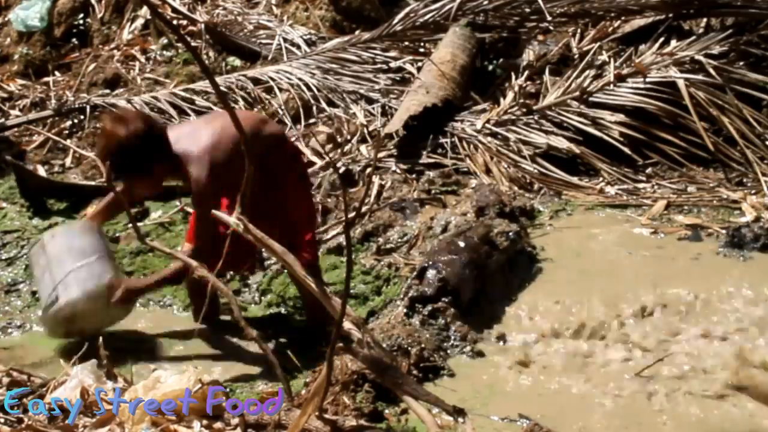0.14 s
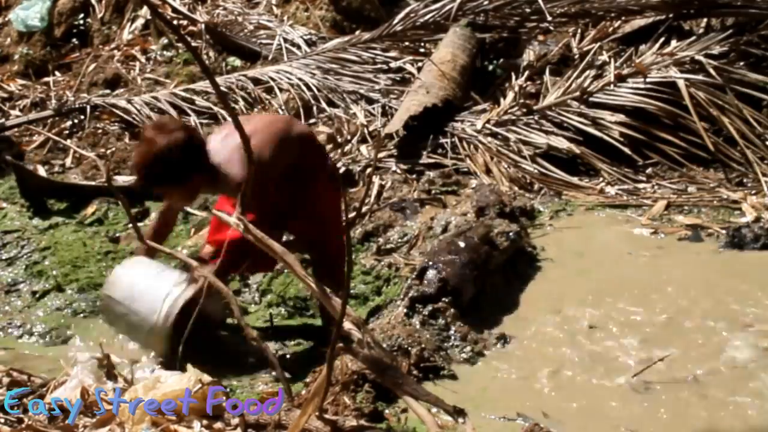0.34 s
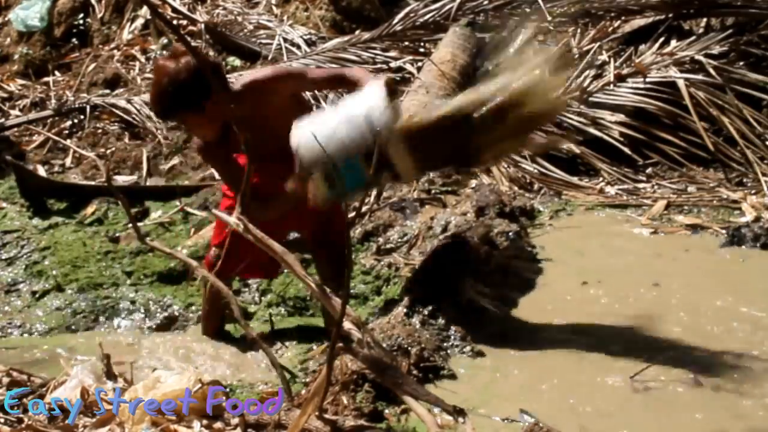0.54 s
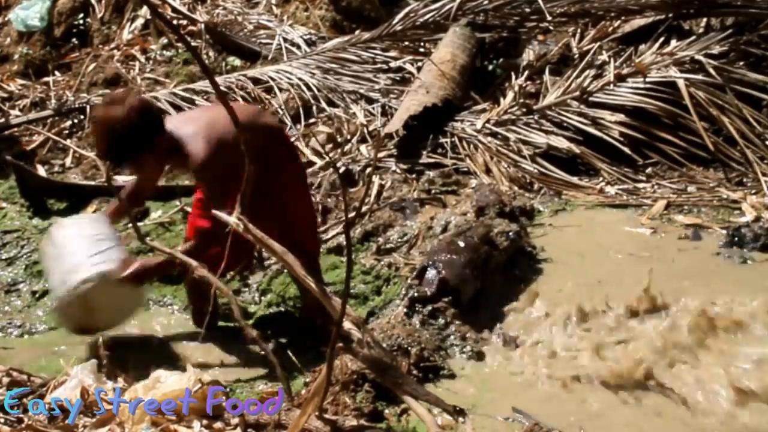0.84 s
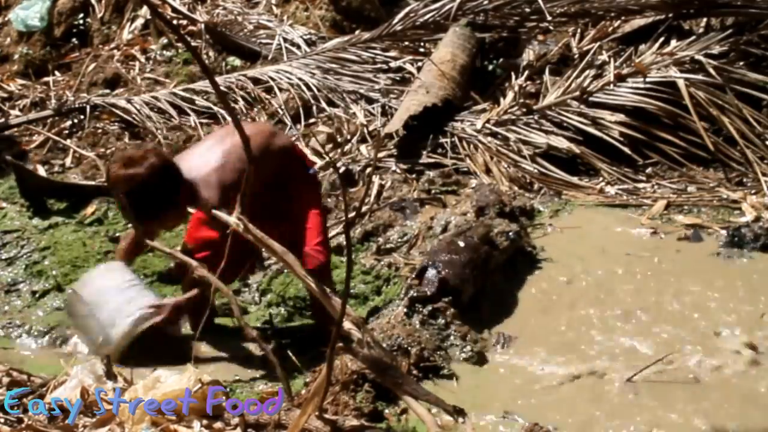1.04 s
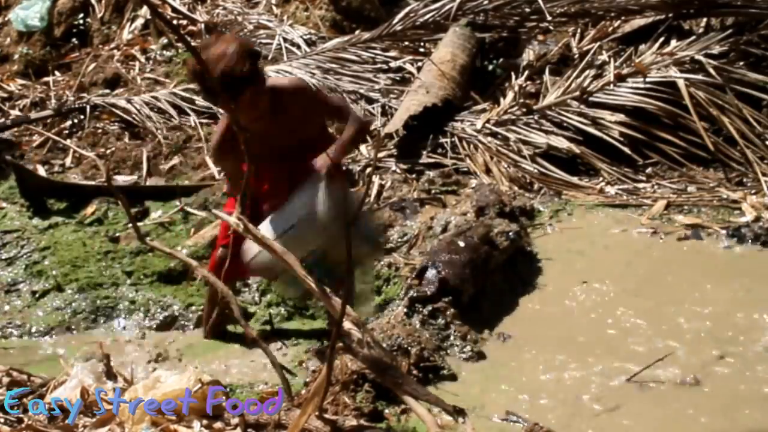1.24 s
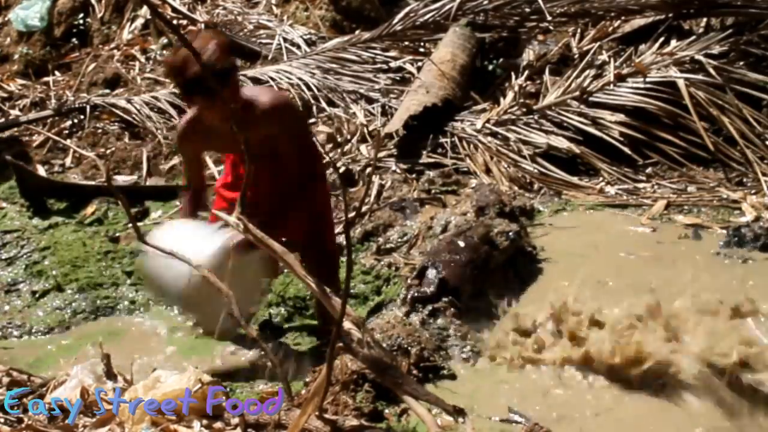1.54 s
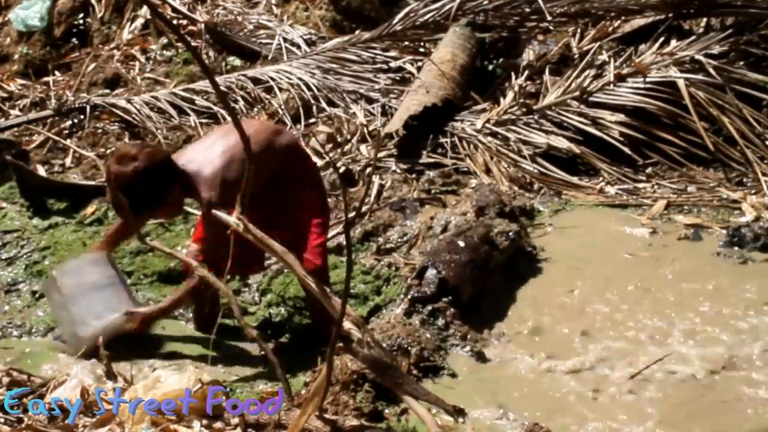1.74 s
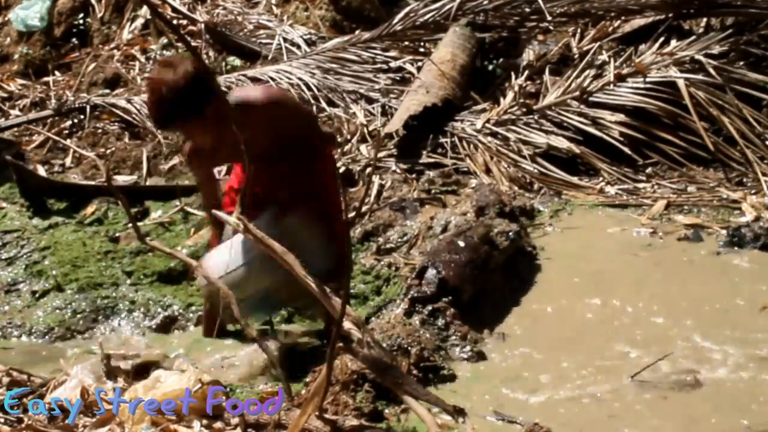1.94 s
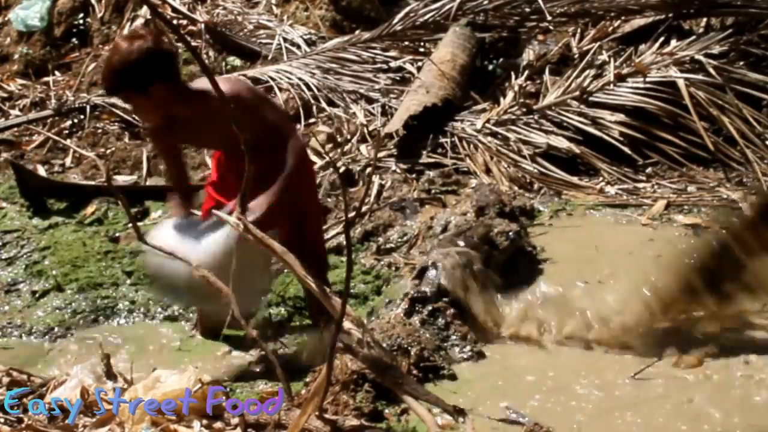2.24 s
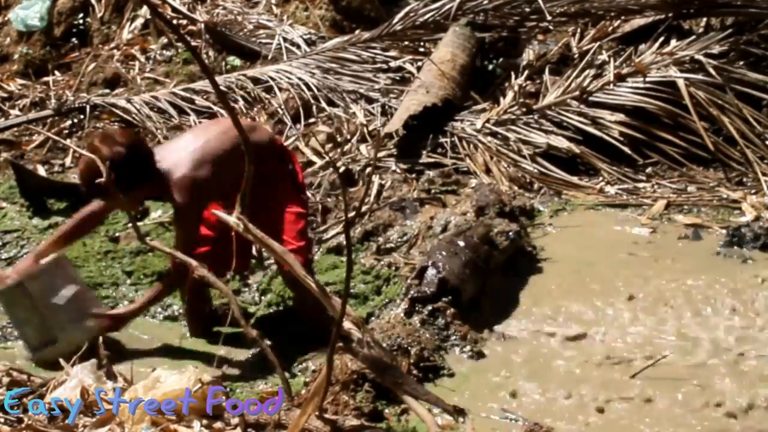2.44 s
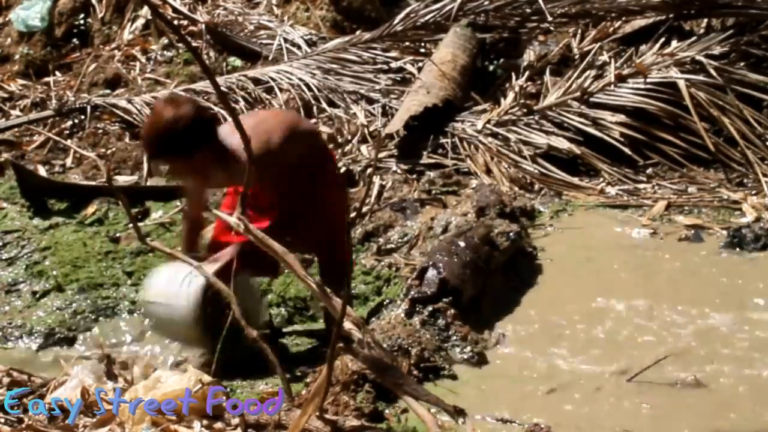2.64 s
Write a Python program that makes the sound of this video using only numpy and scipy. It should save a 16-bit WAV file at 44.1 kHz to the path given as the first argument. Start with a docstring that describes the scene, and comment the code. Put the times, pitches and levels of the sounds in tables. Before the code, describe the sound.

Muddy water flung from a plastic bucket smacks into a shallow pool, again and again

```python
"""A plastic bucket bails a shallow muddy pool in the open air, about one throw every 0.75 s.
Over faint air and a trickle (shaped noise), fine drops spatter (band noise) and a load smacks down
(short resonances), splashes as noise impacts and bubble tones, then patters out. Before the next throw
the bucket dips with a hollow gulp (a rising sine), gurgles as bubbles climb in pitch, and water sloshes
in while air pockets plop (single bubble tones) and water clops on plastic (damped modes)."""
import sys
import numpy as np
from scipy import signal
from scipy.fft import rfft, irfft, next_fast_len
from scipy.io import wavfile

SR = 44100
rng = np.random.default_rng(int(sys.argv[2]) if len(sys.argv) > 2 else 0)


def dump(signal):
    """Clip the signal to [-1, 1] and save it as 16-bit WAV at the path in sys.argv[1]."""
    limited = np.clip(np.atleast_2d(signal).T, -1, 1)
    pcm = np.round(limited * 32767).astype(np.int16)
    wavfile.write(sys.argv[1], SR, pcm)


N = 123479
T = np.arange(N) / SR  # s


def from_db(db):
    """Logarithmic level: decibels become an amplitude gain."""
    return 10 ** (np.asarray(db) / 20)


def rms_one(x):
    """Normalisation: scale to unit root mean square."""
    return x / np.sqrt(np.mean(x ** 2) + 1e-20)


def at_hz(points, hz):
    """Interpolation of a spectrum along a logarithmic frequency axis."""
    f, db = np.transpose(points)
    return np.interp(np.log(np.maximum(hz, 1)), np.log(f), db)


def colour(x, spectrum):
    """Minimum-phase filtering: a causal filter of the given spectrum; white input keeps its level."""
    size = 2 * next_fast_len(N // 2 + 8192)
    hz = np.arange(size // 2 + 1) * SR / size
    gain = rms_one(from_db(at_hz(spectrum, hz)))
    # folding the cepstrum onto positive time makes the filter causal
    cepstrum = irfft(np.log(gain))
    cepstrum[1:size // 2] *= 2
    cepstrum[size // 2 + 1:] = 0
    response = np.exp(rfft(cepstrum))
    return irfft(rfft(x, size) * response)[:N]


def add(out, s, sound):
    """Superposition: mix a sound in at a time in seconds."""
    i = int(np.clip(s * SR, 0, N - 1))
    out[i:i + len(sound)] += sound[:N - i]


def drift(rate):
    """Low-passed noise: a smooth random course with spread 1 and corner rate in Hz."""
    r = np.exp(-2 * np.pi * rate / SR)
    noise = rng.standard_normal(N + SR)
    return rms_one(signal.lfilter([1], [1, -2 * r, r * r], noise)[SR:])  # skip the filter's first second


def swell(s, rise, fall):
    """Exponential growth to 1 at a time, then exponential decay."""
    return np.exp(-np.minimum(np.maximum((s - T) / rise, (T - s) / fall), 50))


def drops(per_s, spread_db, clump_db):
    """Random impulse train: droplet impacts of uneven size that come in clumps; rms 1."""
    sizes = from_db(spread_db * np.minimum(rng.exponential(1, N), 4)) * rng.choice([-1, 1], N)
    impacts = rng.random(N) < per_s / SR
    return rms_one(sizes * impacts * from_db(clump_db * drift(68)))


BUBBLE_RISE = 0.13  # pitch gains twice this share by t60


def bubble(hz, t60, onset_s):
    """Bubble resonance: a sine that swells, decays and rises in pitch as the bubble nears the surface."""
    t = np.arange(int((t60 + onset_s) * SR)) / SR
    onset = np.sin(np.pi / 2 * np.minimum(t / onset_s, 1)) ** 2
    decay = from_db(-60 * np.maximum(t - onset_s, 0) / t60)
    return onset * decay * np.sin(2 * np.pi * hz * t * (1 + BUBBLE_RISE * t / t60))


# relative height of a bubble's tone against its pitch: (f/Hz, level/dB)
BUBBLE_HEIGHTS = [(350, -6), (460, -10), (700, -2.5), (1400, 3.5), (3000, 5.5), (7000, -0.5), (11000, 2)]
BUBBLE_CYCLES = 15.4  # mean cycles to fall 60 dB
BUBBLE_SPREAD_DB = 2.5  # mean of the random extra height, before its cap


def bubbles(level, count, cycles):
    """Superposed resonators: a cloud of mostly small bubbles, each as strong as the flow at its birth."""
    out, energy = np.zeros(N), 0
    low, high = BUBBLE_HEIGHTS[0][0], BUBBLE_HEIGHTS[-1][0]
    for when, pitch, size, life, sign in rng.random((count, 5)):
        hz = low * (high / low) ** (pitch ** .7)
        db = at_hz(BUBBLE_HEIGHTS, hz) + BUBBLE_SPREAD_DB * min(-np.log(1 - size), 3)
        tone = bubble(hz, cycles * (.5 + life) / hz, .5 / hz)
        sound = from_db(db) * np.sign(sign - .5) * tone
        energy += sound @ sound
        add(out, when * N / SR, sound * level[int(when * N)])
    return out / np.sqrt(energy / N)


def slaps(events, modes):
    """Modal synthesis: each slap rings the same damped resonances at a pitch of its own."""
    out = np.zeros(N)
    for s, db, hz, *_ in events:
        for k, (ratio, mode_db, t60) in enumerate(modes):
            level = from_db(db + mode_db + rng.normal(0, 1))
            add(out, s, (-1) ** k * level * bubble(hz * ratio, t60, 1 / hz))
    return out


SPIT_RISE_S = 0.0014  # a spit of spray takes a moment to open
# relative spectral density of a spit of spray: (f/Hz, level/dB per Hz)
SPIT_SPECTRUM = [(60, -48), (250, -16.5), (700, -1.5), (1500, 3.5), (4000, -3.5), (8000, -11.5),
                 (16000, -26)]


def spits(events, t60):
    """Decaying filtered noise: a tiny burst of spray for each event."""
    envelope, t = np.zeros(N), np.arange(SR // 10) / SR
    for s, db, *_ in events:
        add(envelope, s, from_db(db - 60 * t / t60) * np.minimum(t / SPIT_RISE_S, 1))
    return colour(envelope * rng.standard_normal(N), SPIT_SPECTRUM)


AIR_DB = -50.5
# relative spectral density of the outdoor air: (f/Hz, level/dB per Hz)
AIR_SPECTRUM = [(25, 0), (60, -3.5), (200, 7), (600, -1), (1000, 0.5), (1500, 5.5), (3000, -1.5),
                (7000, -10.5), (12000, -16), (16000, -27)]


def outdoor_air():
    """Stationary broadband noise: the faint open air."""
    return from_db(AIR_DB) * colour(rng.standard_normal(N), AIR_SPECTRUM)


BANK_DB, BANK_T60_S, BANK_BAND_HZ = -27, 0.17, [250, 2200]


def banks(x):
    """Diffuse reflection: dull, short scatter from the mud banks and dry fronds."""
    t = np.arange(SR // 2) / SR
    echoes = rng.standard_normal(len(t)) * from_db(-60 * t / BANK_T60_S) * (t > .005)
    echoes = signal.sosfilt(signal.butter(2, BANK_BAND_HZ, "band", fs=SR, output="sos"), echoes)
    return from_db(BANK_DB) * signal.fftconvolve(x, echoes / np.sqrt(echoes @ echoes))[:N]


TRICKLE_DB, SLOSH_SPRAY_DB, SLOSH_BUBBLES_DB = -54.5, -2.5, -2.5
# swells of flow round the bucket: (peak t/s, level/dB, rise t/s, fall t/s)
SLOSH_SWELLS = [(0.495, -35, 0.04, 0.017), (0.553, -37.5, .02, 0.052), (1.161, -35.5, 0.017, 0.0089),
                (1.214, -40.5, 0.011, 0.016), (1.305, -39, 0.046, 0.094), (1.90, -49, 0.3, 0.043),
                (2.03, -40.5, 0.08, 0.058), (2.115, -42.5, 0.04, 0.046), (2.69, -41.5, 0.1, 0.41),
                (2.784, -36, 0.004, 0.015)]
# relative spectral density of slosh spray: (f/Hz, level/dB per Hz)
SLOSH_SPECTRUM = [(40, -24), (200, -6), (420, 2), (700, -1), (1200, 1.5), (3000, 0.5), (8000, -5),
                  (11000, -15), (16000, -20)]


def sloshes():
    """Flow-modulated impacts and bubbles: water runs into and off the bucket, over a steady trickle."""
    flow = from_db(TRICKLE_DB)
    for s, db, rise, fall in SLOSH_SWELLS:
        flow = flow + from_db(db) * swell(s, rise, fall)
    spray = colour(flow * drops(per_s=6000, spread_db=1.5, clump_db=3.0), SLOSH_SPECTRUM)
    cloud = bubbles(flow, count=3000, cycles=BUBBLE_CYCLES)
    return from_db(SLOSH_SPRAY_DB) * spray + from_db(SLOSH_BUBBLES_DB) * cloud


GULP_RISE_PER_S = 0.92  # share of the first pitch gained each second
GULP_WAVER = 0.26  # spread in phase (rad) and as a share of level
# the bucket dips and swallows water: (t/s, length t/s, f/Hz, level/dB)
GULP_NOTES = [(0.279, 0.026, 200, -34), (1.054, 0.027, 195, -43), (1.102, .032, 197, -41.5),
              (1.139, 0.028, 221, -27), (1.853, 0.067, 204, -30.5), (2.533, 0.027, 193, -42),
              (2.605, 0.073, 202.5, -44)]


def gulps():
    """Cavity resonance: air in the dipping bucket gives a low, unsteady note that rises as it fills."""
    out = np.zeros(N)
    for s, length, hz, db in GULP_NOTES:
        t = np.arange(int(length * SR)) / SR
        waver = GULP_WAVER * drift(35)[:len(t)]
        phase = 2 * np.pi * hz * t * (1 + GULP_RISE_PER_S * t / 2) + waver
        add(out, s, from_db(db) * signal.windows.tukey(len(t), .4) * np.sin(phase))
    return out * (1 + GULP_WAVER * drift(57))


GURGLE_T60_S, GURGLE_BUBBLES_PER_S = 0.04, 110
GURGLE_SCATTER = 0.32  # largest deviation of log pitch
DAUGHTER_DB, DAUGHTER_RATIO = -5.5, 2.59  # level against a mean parent; highest multiple of its pitch
# runs of bubbles as a hollow fills: (t/s, length t/s, first f/Hz, last f/Hz, level/dB)
GURGLE_RUNS = [(0.362, 0.091, 206, 280, -47.5), (0.52, 0.093, 415, 473, -48.5),
               (1.155, 0.035, 240, 270, -40.5), (1.195, 0.038, 392, 477, -42), (1.265, 0.03, 360, 390, -45),
               (1.643, 0.095, 384, 554, -38.5), (1.85, 0.061, 393, 438, -41),
               (1.928, 0.045, 292, 418, -40.5), (2.089, 0.11, 394, 488, -46.5),
               (2.335, 0.084, 202, 302, -39.5), (2.391, 0.081, 397, 573, -30.5),
               (2.605, 0.05, 235, 335, -41.5), (2.645, 0.054, 242, 410, -45.5)]


def gurgles():
    """Bubble resonance in a filling hollow: big uneven bubbles climb in pitch and shed smaller ones."""
    out = np.zeros(N)
    for s, length, first_hz, last_hz, db in GURGLE_RUNS:
        run = np.zeros(int((length + 2 * GURGLE_T60_S) * SR))
        count = int(length * GURGLE_BUBBLES_PER_S) + 1
        for k, (when, pitch, size, split, late) in enumerate(rng.random((count, 5))):
            share = (k + when) / count
            birth = share * length
            hz = (first_hz + share * (last_hz - first_hz)) * np.exp(GURGLE_SCATTER * (2 * pitch - 1))
            add(run, birth, (.5 + size) * bubble(hz, GURGLE_T60_S, 1 / hz))
            daughter = bubble(hz * DAUGHTER_RATIO ** (.5 + split / 2), GURGLE_T60_S, 1 / hz)
            add(run, birth + late * GURGLE_T60_S / 2, from_db(DAUGHTER_DB) * daughter)
        add(out, s, from_db(db) * run / np.sqrt(run @ run / (length * SR)))
    return out


# large air pockets: (t/s, f/Hz, level/dB, swell t/s, t60 t/s)
AIR_POCKETS = [(0.111, 510, -10, 0.0034, .04), (0.157, 466, -11, 0.0033, 0.052),
               (0.355, 392, -28, 0.0042, 0.023), (0.485, 429, -12, 0.0055, 0.039),
               (0.499, 445, -32, 0.0053, 0.088), (0.542, 1064, -12.5, 0.0022, 0.032),
               (0.545, 370, -26, 0.0016, 0.055), (0.865, 724, -13.5, 0.0029, 0.055),
               (0.879, 446, -10, 0.005, 0.024), (1.045, 540, -27, .0032, 0.022),
               (1.062, 590, -23.5, 0.0018, 0.011), (1.151, 367, -21.5, 0.0031, 0.017),
               (1.293, 1340, -26, .003, .034), (1.324, 1937, -17.5, 0.00087, 0.025),
               (1.606, 994, -16.5, .003, 0.082), (1.992, 537, -35, 0.011, 0.048),
               (2.069, 920, -17.5, .002, 0.046), (2.345, 430, -17, .004, 0.021),
               (2.432, 488, -19.5, 0.0034, 0.044), (2.622, 752, -29.5, 0.0084, 0.067)]


def plops():
    """Single bubble resonance: large pockets of trapped air ring briefly."""
    out = np.zeros(N)
    for s, hz, db, onset_s, t60 in AIR_POCKETS:
        add(out, s, from_db(db) * bubble(hz, t60, onset_s))
    return out


HOLLOW_HZ, HOLLOW_DB, HOLLOW_T60_S = 222, -26.5, 0.05  # the air in the bucket answers each clop
CLOP_SPRAY_DB, CLOP_SPRAY_T60_S = -7.5, 0.023
# water clops against the bucket: (t/s, level/dB, f/Hz)
CLOP_HITS = [(0.447, -20, 1104), (0.540, -19, 1394), (0.746, -28.5, 970), (1.157, -30, 1146),
             (1.163, -21, 1014), (1.3235, -11, 1272), (1.334, -18, 1077), (2.0649, -9.5, 1125),
             (2.074, -17.5, 1120), (2.086, -23.5, 1270), (2.138, -20, 1030), (2.635, -27, 1076),
             (2.678, -24.5, 1255)]
# resonances of a clop: (ratio to its f, level/dB, t60 t/s)
CLOP_RESONANCES = [(.35, -19, 0.047), (.82, -10.5, 0.062), (1.0, -2, 0.011), (1.2, -11.5, 0.012),
                   (1.55, -15.5, 0.022), (2.0, -9, 0.025), (2.5, -14.5, 0.019), (3.7, -13.5, 0.019)]


def clops():
    """Impact excitation of modes: water slaps shut against the plastic and spits a little spray."""
    hollow_hits = [(s, db, HOLLOW_HZ) for s, db, _ in CLOP_HITS]
    hollow = slaps(hollow_hits, [(1, HOLLOW_DB, HOLLOW_T60_S)])
    spray = from_db(CLOP_SPRAY_DB) * spits(CLOP_HITS, CLOP_SPRAY_T60_S)
    return slaps(CLOP_HITS, CLOP_RESONANCES) + hollow + spray


SPATTER_WIDTH = 1.55  # band edges, as a ratio to the centre
# fine drops and flecks of mud: (t/s, level/dB, t60 t/s, centre f/Hz)
SPATTER_BURSTS = [(0.060, -33, 0.03, 4140), (0.091, -28.5, 0.091, 5500), (0.4872, -24.5, 0.021, 3900),
                  (0.5392, -18, 0.022, 3500), (0.833, -22.5, 0.086, 4270), (1.155, -36, 0.034, 5970),
                  (1.207, -32.5, .03, 4170), (1.2508, -29, 0.025, 4840), (1.28, -28, 0.07, 5740),
                  (1.52, -22.5, 0.013, 3720), (1.5805, -21, 0.04, 3800), (2.285, -38, 0.19, 6350),
                  (2.319, -25, 0.084, 4600), (2.581, -23.5, 0.015, 5840)]


def spatters():
    """Band-limited grainy noise: fine drops land together, each handful with its brightness and length."""
    out, t = np.zeros(N), np.arange(SR // 8) / SR
    for s, db, t60, hz in SPATTER_BURSTS:
        edges = [hz / SPATTER_WIDTH, hz * SPATTER_WIDTH]
        band = signal.butter(2, edges, "band", fs=SR, output="sos")
        grains = rms_one(signal.sosfilt(band, rng.laplace(size=len(t))))
        add(out, s, grains * from_db(db - 60 * t / t60) * np.minimum(t / SPIT_RISE_S, 1))
    return out


BURST_T60_S = 0.056
# a slab of water smacks down and bursts: (t/s, level/dB, f/Hz, burst level/dB)
SLAB_HITS = [(0.1105, -5.5, 3020, -17.5), (0.117, -20, 1270, -19.5), (0.1382, -12, 1480, -32),
             (0.1612, -16.5, 1210, -23), (0.8803, -13, 1880, -16.5), (0.9156, -16, 1000, -20),
             (0.944, -18.5, 715, -21), (1.026, -23, 1310, -28), (1.5958, 0.5, 946, -23),
             (1.626, -13.5, 1470, -20), (2.3469, -22, 1630, -18.5), (2.3675, -13.5, 1270, -15),
             (2.4078, -10.5, 860, -15), (2.428, -17, 1800, -32), (2.4576, -17, 1400, -32)]
# resonances of a smack: (ratio to its f, level/dB, t60 t/s)
SMACK_RESONANCES = [(.2, -15, 0.024), (.5, -12, 0.0011), (1.0, 0, 0.0045), (2.9, -8, 0.0033),
                    (6.5, -9, 0.00069)]


def smacks():
    """Impact excitation and noise burst: slabs of water hit the pool with a hard smack and dark spray."""
    bursts = [(s, burst_db) for s, _, _, burst_db in SLAB_HITS]
    return slaps(SLAB_HITS, SMACK_RESONANCES) + spits(bursts, BURST_T60_S)


SPRAY_DB, SPLASH_BUBBLES_DB = 0.53, -0.73
HEAVY_DB, FULL_FLOW_DB, HEAVY_FOLLOWS = -26.5, -23, 1.72  # level at full flow; power of flow it follows
PATTER_DB, PATTER_TOP_DB = -7, -28  # a patter of bubbles follows the flow up to the top level
DRAIN_DB_PER_S = 155  # slope of the flow before and after each curve
# water landing in the pool, one curve per throw: (t/s, level/dB)
THROW_CURVES = [
    [(0.07, -51), (0.086, -46), (0.092, -41), (0.104, -36), (0.11, -19.5), (0.152, -24), (0.2, -24.5),
     (0.215, -33.5), (0.292, -33), (0.41, -51.5)],
    [(0.818, -52), (0.832, -37), (0.854, -36), (0.864, -20), (0.932, -26), (1.004, -35), (1.04, -36),
     (1.12, -47)],
    [(1.56, -49), (1.577, -35), (1.594, -21), (1.63, -23.5), (1.66, -31.5), (1.756, -32), (1.804, -35.5),
     (1.85, -51)],
    [(2.29, -49), (2.335, -32.5), (2.378, -22), (2.42, -27), (2.462, -28.5), (2.47, -34), (2.544, -33),
     (2.58, -36.5), (2.62, -44.5)],
]
# relative spectral density of spray: (f/Hz, level/dB per Hz)
SPRAY_SPECTRUM = [(30, -29), (120, -26.5), (300, -14.5), (480, 5), (1000, -2), (2000, -2), (4000, 0),
                  (8000, -5), (11000, -16), (16000, -22.5)]
# relative spectral density of the heavy body: (f/Hz, level/dB per Hz)
HEAVY_SPECTRUM = [(30, -43), (90, -14.5), (200, -4), (300, -10.5), (470, 6.5), (800, -1.5), (2000, -4),
                  (8000, -35), (16000, -34)]


def splashes():
    """Flow-modulated impacts and bubbles: thrown water lands as spray, heavy body and a level-capped bubble
    patter."""
    flow = np.zeros(N)
    for throw in THROW_CURVES:
        s, db = np.transpose(throw)
        outside_s = np.abs(T - np.clip(T, s[0], s[-1]))
        flow += from_db(np.interp(T, s, db) - DRAIN_DB_PER_S * outside_s)
    spray = colour(flow * drops(per_s=9000, spread_db=3.5, clump_db=1.5), SPRAY_SPECTRUM)
    heavy_flow = (flow / from_db(FULL_FLOW_DB)) ** HEAVY_FOLLOWS
    heavy = colour(heavy_flow * drops(per_s=4300, spread_db=4.0, clump_db=0.5), HEAVY_SPECTRUM)
    cloud = bubbles(flow, count=7000, cycles=BUBBLE_CYCLES)
    patter = bubbles(np.minimum(flow, from_db(PATTER_TOP_DB)), count=700, cycles=12)
    noise = from_db(SPRAY_DB) * spray + from_db(HEAVY_DB) * heavy
    return noise + from_db(SPLASH_BUBBLES_DB) * cloud + from_db(PATTER_DB) * patter


def scene():
    """Superposition: all the water, its scatter and the faint outdoor air."""
    bucket = sloshes() + gulps() + gurgles() + plops() + clops()
    water = bucket + spatters() + smacks() + splashes()
    return (outdoor_air() + banks(water) + water)[None]


CUTOFF_HZ = 16000


def record(dry):
    """Clipping and low-pass filtering: peaks are limited to full scale, then the top is cut."""
    low_pass = signal.ellip(12, .1, 75, CUTOFF_HZ, fs=SR, output="sos")
    return signal.sosfilt(low_pass, np.clip(dry, -1, 1))


dry = scene()
out = record(dry)
dump(out)
```